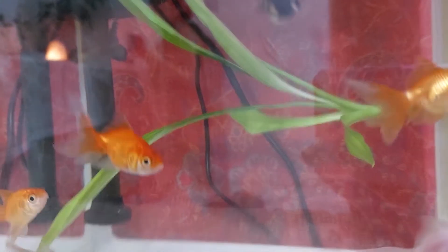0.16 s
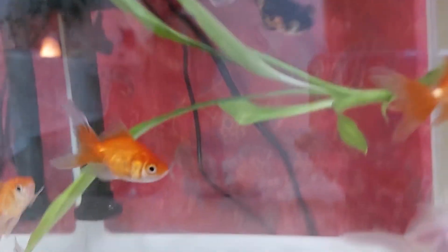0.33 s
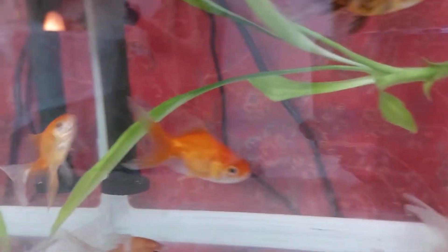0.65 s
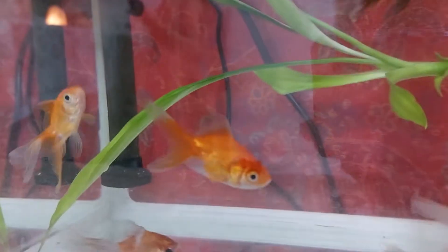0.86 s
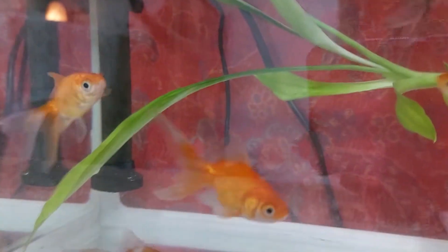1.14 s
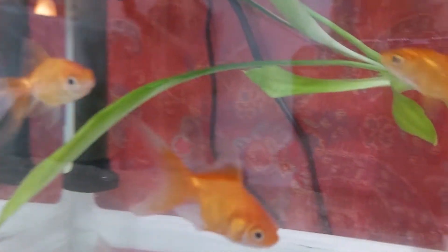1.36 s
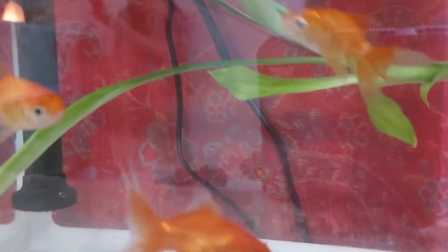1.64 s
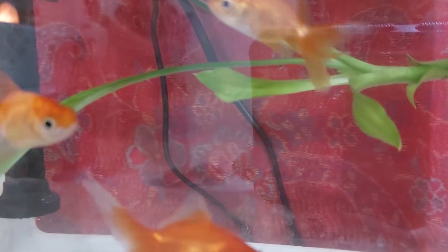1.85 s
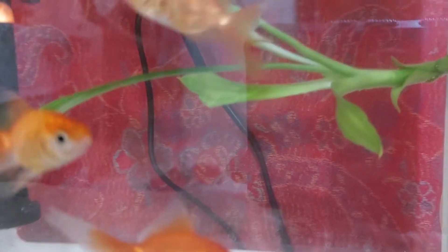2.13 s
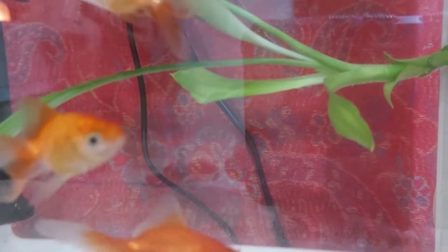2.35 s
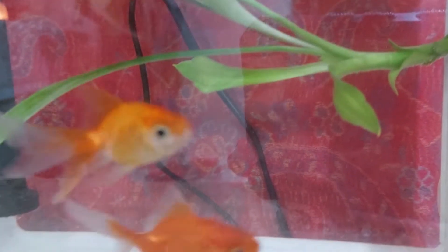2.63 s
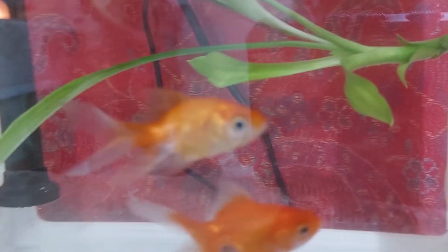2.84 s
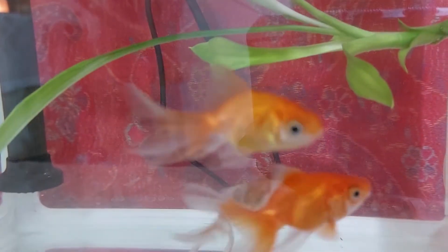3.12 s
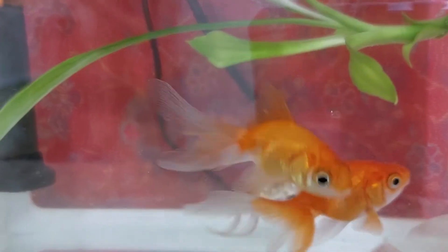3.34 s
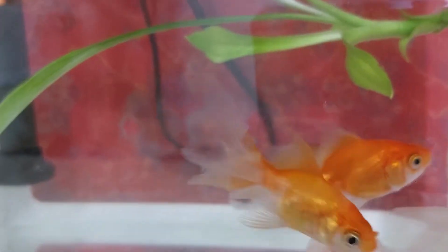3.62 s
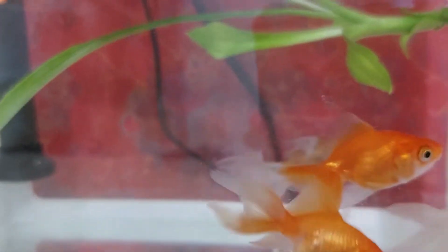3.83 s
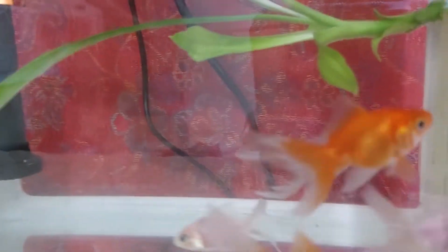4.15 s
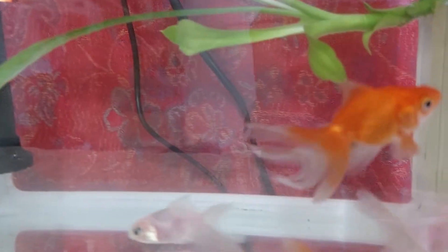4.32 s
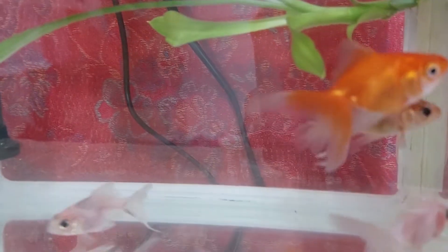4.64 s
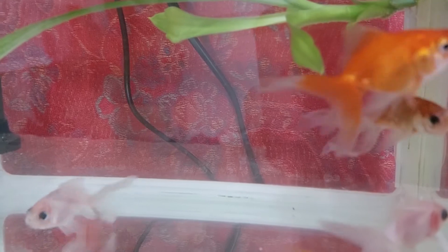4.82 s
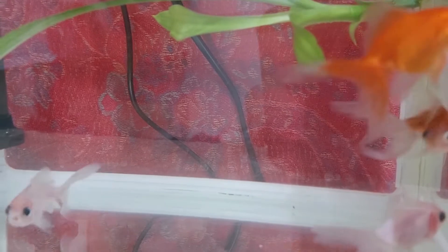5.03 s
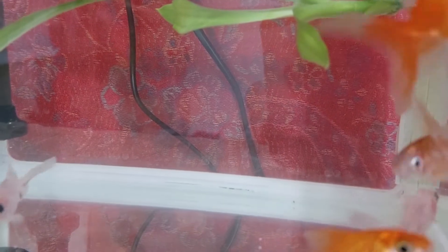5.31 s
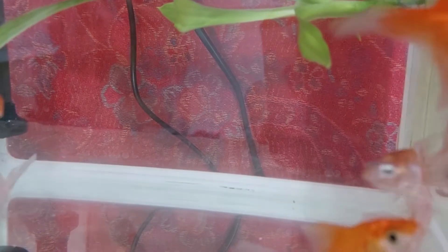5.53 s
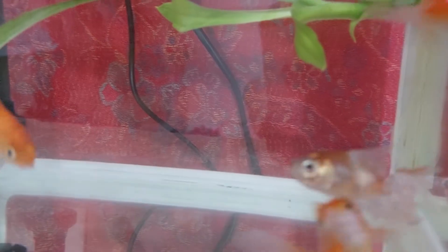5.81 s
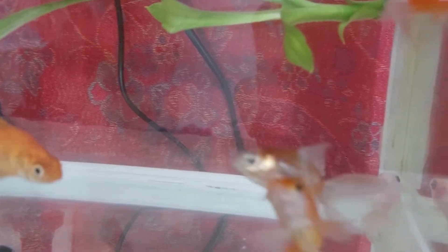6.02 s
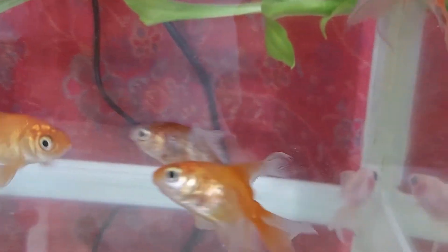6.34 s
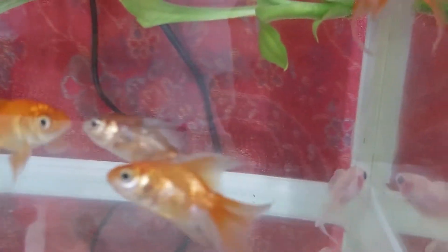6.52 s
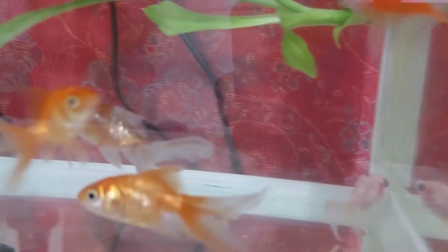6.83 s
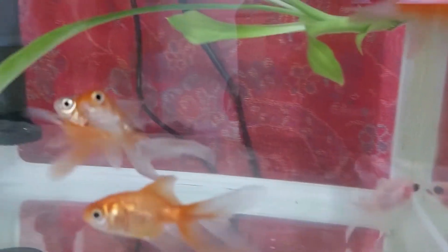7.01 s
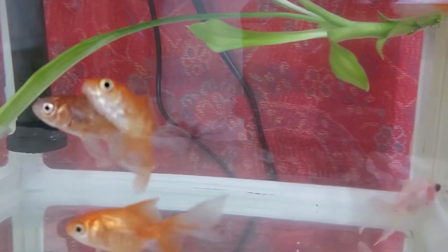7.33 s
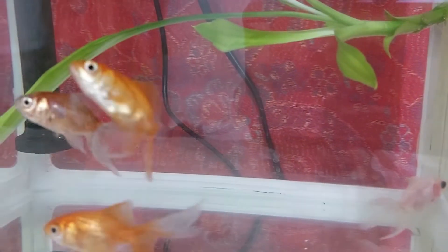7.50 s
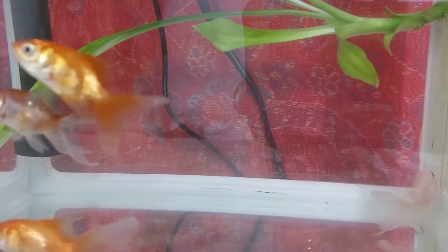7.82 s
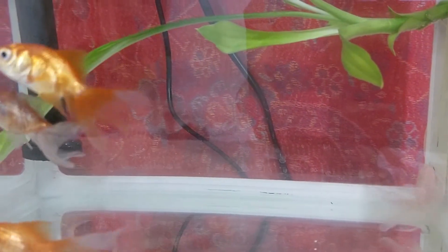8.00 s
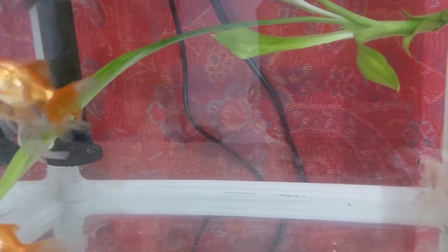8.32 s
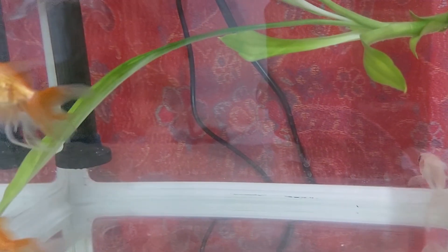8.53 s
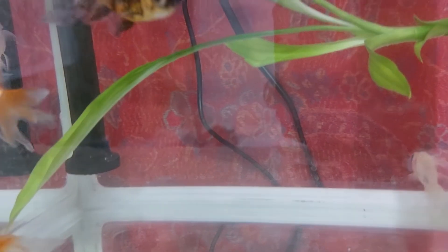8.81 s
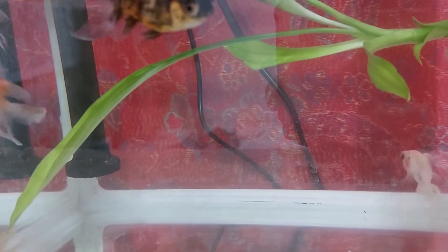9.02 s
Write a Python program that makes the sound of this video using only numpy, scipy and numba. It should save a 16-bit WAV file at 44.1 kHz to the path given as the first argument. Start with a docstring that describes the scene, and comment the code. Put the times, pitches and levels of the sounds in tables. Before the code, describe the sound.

A constant low electrical hum fills an indoor aquarium, heard near the glass in stereo. Air crackles and fizzes unevenly to the right; stirred water rumbles dully and trickles to the left. Hollow plops cluster just before one second, with short splashy washes. One more strong plop comes at three seconds, a softer one before six, among small bubble cracks, and delicate gurgling closes the scene.

```python
"""A small mains pump hums in a goldfish tank in a quiet room, heard from close to the glass.
From the start, stirred water rumbles in the tank's resonances, small bubbles trickle at the surface to the
left, and air fizzes in uneven spurts to the right. Soon single bubbles crack; large ones plop, most of them
in the first second, among brief swishes and two moments of squeaking air; then come spells of gurgling.
Sines make the hum and the ringing bubbles; filtered noise and pops make the rest. The left side is dull."""
import sys
import numpy as np
from scipy import signal
from scipy.fft import rfft, irfft
from scipy.io import wavfile
from scipy.ndimage import uniform_filter1d
from numba import njit

SR = 44100
rng = np.random.default_rng(int(sys.argv[2]) if len(sys.argv) > 2 else 0)


def to_wav(sig):
    """Store sig (one row per channel, or 1-D mono) as 16-bit WAV at the path in sys.argv[1].

    Samples outside -1..1 are clipped; the rate is SR.
    """
    pcm = np.clip(np.atleast_2d(sig), -1, 1) * 32767
    pcm = np.round(pcm).astype(np.int16)
    wavfile.write(sys.argv[1], SR, pcm.T)  # frames by channels


N = 403956
TIME = np.arange(N) / SR  # s
MAINS_HZ = 50.025
TOP_HZ = 15700  # upper edge of the microphones' range


def undb(db):
    """Decibels to amplitude gain: 20 dB is a factor of ten."""
    return 10 ** (np.asarray(db) / 20)


def unit(x):
    """Normalise the mean power: scale to rms 1."""
    return x / np.sqrt(np.mean(x ** 2))


def curves(table):
    """Linear interpolation in time: each column of a curve table, sample by sample."""
    s, *columns = np.transpose(table)
    return [np.interp(TIME, s, column) for column in columns]


def walk(rate):
    """Slow random modulation: straight lines join `rate` random points a second; rms about 1.73."""
    steps = rng.standard_normal(2048)
    return 2.12 * np.interp(TIME * rate, np.arange(len(steps)), steps)


def ring(x, modes, size=8192):
    """Modal resonance: steep-sided peaks summed in power, as one minimum-phase response; result has rms 1."""
    f = np.arange(size // 2 + 1) * SR / size
    power = sum(undb(2 * db) / (1 + (2 * (f - hz) / width) ** 2) ** 2 for hz, width, db in modes)
    # folding the cepstrum onto positive times makes the response causal
    cepstrum = irfft(np.log(power ** .5))[:size // 2]
    cepstrum[1:] *= 2
    response = irfft(np.exp(rfft(cepstrum, size)))
    return unit(signal.oaconvolve(x, response)[:N])


def pops(rate, spread_db):
    """Shot noise: impulses at random moments and of either sign, most weak and a few strong; rms 1."""
    count = int(rate * N / SR)
    moment = rng.integers(0, N, size=40000)[:count]
    sign, scatter = rng.standard_normal((2, 40000))[:, :count]
    strength = np.sign(sign) * undb(spread_db * np.minimum(scatter, 2.5))
    return unit(np.bincount(moment, strength, N))


def lowpass(x, hz, order):
    """Zero-phase filtering: a Butterworth low-pass run forwards and backwards."""
    return signal.sosfiltfilt(signal.butter(order, hz, fs=SR, output="sos"), x)


@njit
def band(x, hz, width):
    """Resonant filtering: two state-variable band-passes in a row, with a moving centre."""
    y, b, l = np.empty(len(x)), np.zeros(2), np.zeros(2)
    for i in range(len(x)):
        if i % 32 == 0:
            g, k = np.tan(np.pi * min(hz[i] / SR, .45)), width / hz[i]
        u = x[i] + 1e-18  # keeps the filter states from becoming denormal
        for j in range(2):
            v = (b[j] + g * (u - l[j])) / (1 + g * (g + k))
            b[j], l[j], u = 2 * v - b[j], l[j] + 2 * g * v, k * v
        y[i] = u
    return y


def place(x, pan_db):
    """Level-difference stereo: one sound in both channels, left minus right in dB."""
    return np.array([x * undb(pan_db / 2), x * undb(-pan_db / 2)])


def pump():
    """Magnetic hum: the magnet pulls twice per mains cycle; weaker lines waver around that steady tone."""
    # hum: time_s, rms level_db, pan_db (left minus right)
    hum_curve = [(0.2, -34.1, -1.3), (0.7, -33.5, -1.9), (1.15, -33.0, -1.4), (1.8, -31.1, 0.1),
                 (3.1, -30.7, -0.2), (4.0, -31.7, 0.1), (5.5, -31.7, 0.1), (6.7, -32.3, 0.4),
                 (7.5, -31.8, -0.2), (8.9, -31.8, -1.5)]
    # weaker tones: pitch_hz, relative_db (against the hum)
    weak_lines = [(49.6, -26.5), (153.5, -30.5), (200, -30.5), (215, -34), (222.5, -42), (287, -32),
                  (293, -31.5)]
    hum_db, pan_db = curves(hum_curve)
    hum = np.sin(2 * np.pi * 2 * MAINS_HZ * TIME + 0.033 * walk(12.0)) * undb(hum_db)
    lines = 0
    for hz, db in weak_lines:
        wavering = undb(db + 2 * walk(1.34))
        lines = lines + wavering * np.sin(2 * np.pi * hz * TIME + 0.73 * walk(3))
    return np.sqrt(2) * (place(hum, pan_db) + lines * undb(hum_db))


def rumble():
    """Cavity modes driven by turbulence; the deepest reach both microphones nearly alike."""
    # resonances of the tank and the room: centre_hz, width_hz, relative_db
    tank_modes = [(45.7, 19, -1.5), (85.5, 43.4, 4.5), (122, 13, -4), (147.8, 48, 0.5), (225, 85, -3.5),
                  (254, 29, -7.5), (287, 27.4, 1), (369, 170, -10), (428, 124, -4), (522.6, 27, -10),
                  (577, 64, -8.5), (632, 517, -23)]
    mid, side = (ring(rng.standard_normal(N), tank_modes) for _ in range(2))
    diffuse = 0.1 * side + 0.87 * (side - lowpass(side, 810, order=1))
    # the upper resonances lean to the left
    lean = mid - lowpass(mid, 420, order=1)
    sides = (.28 * lean + 1.1 * diffuse) * np.array([[1], [-1]])
    return undb(-44) * (mid + sides)


def trickle():
    """Shot excitation: dense small bubbles set off the surface's resonances, mostly to the left."""
    # resonances of the trickling surface: centre_hz, width_hz, relative_db
    surface_modes = [(1134, 150, -7), (1575, 390, -6), (1890, 85, 0), (1987, 300, -6.5), (2483, 440, 0.5)]
    # trickle before panning: time_s, level_db
    trickle_curve = [(0, -68.5), (1.2, -68), (2.2, -70.5), (9.16, -70)]
    level_db, = curves(trickle_curve)
    drops = pops(rate=3800, spread_db=4.0) * undb(0.67 * walk(22))
    return place(ring(drops, surface_modes) * undb(level_db), pan_db=26.0)


def flutter():
    """Amplitude modulation: the air flow flutters at random and pulses a little with each pump stroke."""
    stroke = np.sin(2 * np.pi * 2 * MAINS_HZ * TIME)
    return undb(1.07 * walk(55) + 0.5 * stroke)


def gushes():
    """Pressure build-up and release: the air flow stalls, then jumps to a new level and settles."""
    # stalls of the air: release_s, stall_s (time before release), stall_db, swell_db (at release)
    gush_events = [(0.041, 0.021, -14, -3), (0.238, 0.031, -6.5, 6), (0.406, 0.066, -8, -1),
                   (0.524, 0.038, -7.0, 3), (0.771, 0.055, -2, 1), (1.322, 0.026, -10, 2),
                   (1.439, 0.042, -7, 5), (1.499, 0.038, -4.5, 3), (1.607, 0.066, -4, -2),
                   (1.793, 0.048, -5, 3), (2.199, 0.025, -4, 3), (2.268, 0.028, -6, 1),
                   (2.339, 0.045, -10, -1), (2.504, 0.023, -8.5, 4), (2.754, 0.031, -7, 4.5),
                   (2.985, 0.034, -13, -0.5), (3.06, 0.043, -10, 0), (3.156, 0.024, -8, 6),
                   (3.261, 0.057, -12, -3), (3.509, 0.045, -9, -3), (3.69, 0.063, -13, 2),
                   (3.805, 0.034, -7.5, -4), (3.857, 0.033, -7.0, 3.0), (3.953, 0.043, -10, -1),
                   (4.313, 0.019, -12, -1), (4.38, 0.036, -8.5, 2.5), (4.461, 0.049, -6, -4),
                   (4.861, 0.026, -8, 2.5), (5.022, 0.033, -9.5, 3.5), (5.166, 0.041, -11, 5),
                   (5.308, 0.042, -15, 1), (5.404, 0.025, -10, 4), (5.547, 0.032, -6, 2),
                   (5.606, 0.026, -10, 1.5), (6.071, 0.047, -7, -2.0), (6.112, 0.025, -5, 3),
                   (6.402, 0.037, -10.0, 2.5), (6.45, 0.02, -9, 6), (6.535, 0.062, -7, 3),
                   (6.584, 0.042, -5, -6), (6.636, 0.024, -7.5, 1.5), (6.795, 0.041, -5, 5),
                   (6.958, 0.031, -6, -2), (7.284, 0.06, -5, 2), (7.344, 0.032, -5, -4),
                   (7.496, 0.038, -7, -3), (7.599, 0.029, -6.0, 0), (7.749, 0.034, -8, 1),
                   (7.812, 0.026, -5.5, -2), (7.918, 0.039, -7.0, -1), (8.021, 0.028, -7, -1),
                   (8.189, 0.026, -6.5, 0.5), (8.645, 0.043, -11, 2), (8.848, 0.052, -7.5, 0),
                   (9.073, 0.073, -11, 7)]
    onset_s, fade_s = 0.01, 0.021
    db = np.zeros(N)
    for s, stall, stall_db, swell_db in gush_events:
        near = slice(*np.searchsorted(TIME, [s - .5, s + .5]))
        age = TIME[near] - s
        stalled = np.clip((age + stall) / onset_s + .5, 0, 1)
        swell = swell_db * np.exp(-np.abs(age) / fade_s)
        db[near] += np.where(age < 0, stall_db * stalled, swell)
    return undb(uniform_filter1d(db, size=200))


def shade(x, hz, width, table):
    """Parametric equalisation: raise or lower one band of x along a level curve."""
    db, = curves(table)
    return x + (undb(db) - 1) * band(x, np.full(N, float(hz)), float(width))


def reflect(x):
    """Early reflections: delayed copies from the glass walls and the room join the sound; rms 1."""
    # echoes: delay_s, relative_db (against the direct sound)
    echoes = [(.0023, -17.5), (.0057, -21.5), (.0094, -11), (0.0142, -20)]
    late = sum(undb(db) * np.interp(TIME - delay, TIME, x, left=0) for delay, db in echoes)
    return unit(x + late)


def fizz():
    """Modulated shot noise: fine bubbles pop in spurts and ring the outlet's resonances over a smooth mist."""
    # resonances: centre_hz, width_hz, gain_db, swell_share (of the ring's swell; below 0 it recedes)
    fizz_modes = [(860, 830, -6.5, 0.12), (1144, 99, 2, 0.59), (1954, 520, -5, 0.21),
                  (2636, 490, -4.5, 0.31), (3590, 700, -4, -0.23), (4246, 560, 1.5, 1), (4804, 560, -4, 1),
                  (5600, 910, -10, 0.071), (6420, 820, -6, -0.097), (6990, 1130, -8.5, 0.43),
                  (8055, 560, -6, 0.22), (8640, 870, -15, 0.058), (9500, 3800, -17.5, 0.18),
                  (11550, 1230, -14, 0.013), (12150, 1100, -12.5, 0.87), (13100, 3100, -16, 0.25),
                  (15100, 3300, -18, 0.3)]
    # whole fizz before panning: time_s, level_db
    fizz_curve = [(0, -60), (0.6, -61), (1.1, -58.5), (1.5, -60.5), (4.1, -59.5), (4.7, -61), (7.1, -59.5),
                  (9.16, -59.5)]
    # swell of the ring near 4.4 kHz: time_s, gain_db
    swell_curve = [(0, 0.5), (1.1, -3.5), (2.0, 2.5), (4.1, 1), (5.3, 7), (6.8, 2.5), (7.7, -6), (9.16, -4)]
    # gain of the noise that makes the finest bubbles' mist: time_s, gain_db
    mist_curve = [(0, -23.5), (4.0, -30), (4.7, -33), (6.5, -30), (7.1, -21), (9.16, -25)]
    # band near 6.2 kHz: time_s, gain_db
    treble_curve = [(0.4, -1), (1.0, 4), (1.7, -5), (3.6, -7), (4.3, 0), (9.16, 2)]
    # band near 9 kHz: time_s, gain_db
    top_curve = [(0, 2.5), (1.3, 3.5), (2.2, 1.5), (4.0, 3.5), (5.2, -2), (6.5, -7), (7.1, -0.5),
                 (9.16, -3)]
    level_db, = curves(fizz_curve)
    swell_db, = curves(swell_curve)
    mist_db, = curves(mist_curve)
    flow = flutter() * gushes()
    crackle = pops(rate=450, spread_db=6)  # shared by all resonances
    mist = band(rng.standard_normal(N), np.full(N, 8950.0), 8700.0)
    air = undb(mist_db) * flow ** 0.82 * mist
    for hz, width, db, share in fizz_modes:
        # each size of bubble has its own pops and flutter; the swelling resonances pulse hardest
        spray = 0.75 * pops(rate=900, spread_db=4.0) + 0.47 * crackle
        # the finest bubbles follow the spurts less
        follow = 0.67 + .5 * share - 0.18 * hz / TOP_HZ
        own_flutter = undb((1.87 + 0.32 * share) * np.minimum(walk(85), 1.6))
        pulse = unit(flow ** follow * own_flutter)
        drive = spray * pulse + 0.27 * rng.standard_normal(N)
        # each resonance's pitch wavers slightly at random
        waver = 1 + 0.0043 * walk(1.134)
        air = air + undb(db + share * swell_db) * band(drive, hz * waver, float(width))
    air = shade(air, 6170, 1200, treble_curve)
    air = shade(air, 9000, 2600, top_curve)
    return place(reflect(air) * undb(level_db), pan_db=-14.0)


def ticks():
    """Impulsive excitation: single bubbles burst with a short crack of noise, each at its own pitch."""
    # bursts before panning: start_s, peak_db, pitch_hz
    tick_events = [(0.14, -49, 4400), (0.177, -59, 12000), (1.445, -51, 4170), (1.652, -49, 4330),
                   (2.679, -51, 11900), (3.184, -46, 4440), (3.752, -47, 4300), (3.769, -57, 12600),
                   (3.9589, -51, 7940), (4.112, -47, 4500), (4.564, -47, 4270), (4.613, -44.5, 4400),
                   (4.738, -45.5, 4400), (4.821, -57, 12400), (5.068, -48, 4330), (5.312, -45, 4450),
                   (5.3185, -53, 12300), (5.423, -40, 4300), (5.8531, -50, 7000), (5.897, -44, 4280),
                   (6.413, -43, 4240), (6.592, -46.5, 4300), (6.6722, -54, 11800), (7.390, -46, 4320),
                   (7.391, -47, 6500), (8.037, -57, 11900), (8.134, -51, 6500), (8.535, -54, 4300),
                   (8.591, -55, 6540), (8.925, -57, 11800), (9.056, -56, 4300)]
    fade_s, width_hz = 0.0038, 740.0
    out, age = np.zeros(N), np.arange(int(0.0048 * SR)) / SR
    for s, db, hz in tick_events:
        burst = rng.standard_normal(len(age)) * np.exp(-age / fade_s)
        crack = band(burst, np.full(len(age), float(hz)), width_hz)
        out[int(s * SR):][:len(age)] += undb(db) * crack / np.abs(crack).max()
    return place(out, pan_db=-13.5)


def bubbles(rows):
    """Damped resonance: each rings for its own number of cycles, short plop to long ping, rising a little."""
    attack_cycles = 0.67
    out = np.zeros(N + SR)
    for s, hz, cycles, db in rows:
        life = cycles / hz * SR  # in samples
        age = np.arange(int(life)) / life  # from 0 to 1
        attack = 1 - np.exp(-(cycles * age / attack_cycles) ** 2)
        tone = np.sin(2 * np.pi * cycles * age * (1 + 0.022 * age))
        bubble = tone * np.exp(-5 * age) * attack
        out[int(s * SR):][:len(age)] += undb(db) * bubble / np.abs(bubble).max()
    return out[:N]


def plops():
    """Coupled resonators: a large bubble bursts and the tank's wall answers with a dull thud."""
    # plops before panning: start_s, pitch_hz, cycles (until silent), peak_db, thud_db (peak of the thud)
    plop_events = [(0.234, 870, 6.5, -49, -62), (0.7, 420, 5.1, -39, -61), (.707, 775, 9, -45, -60),
                   (0.7783, 680, 2.6, -29.5, -32.5), (.810, 950, 6, -48, -45), (0.846, 420, 3.7, -43, -50),
                   (0.871, 480, 4.4, -48, -47), (.905, 900, 7.8, -50, -60), (.941, 420, 4.3, -40, -48),
                   (3.004, 560, 4.2, -29.5, -36), (5.668, 593, 18, -42.5, -60)]
    thud_hz, thud_cycles = 305, 3.2
    bursts = [(s, hz, cycles, db) for s, hz, cycles, db, _ in plop_events]
    thuds = [(s, thud_hz, thud_cycles, thud_db) for s, *_, thud_db in plop_events]
    return bubbles(bursts + thuds)


def swishes():
    """Enveloped noise: water washes along the glass in a spatter of drops, over a deep churning slosh."""
    # washes: start_s, length_s (time scale of the fall), level_db, slosh_db (both before the envelope)
    swish_events = [(0.316, 0.058, -47.5, -65), (0.778, 0.018, -43, -40.5), (0.787, 0.12, -48, -44),
                    (0.938, 0.022, -50, -55), (1.958, 0.071, -48, -66), (3.005, 0.007, -47, -38),
                    (5.647, 0.076, -49.5, -52), (7.127, 0.083, -44.5, -52)]
    # resonances of the wash: centre_hz, width_hz, relative_db
    swish_modes = [(506, 570, 9.5), (1160, 1100, -4), (2200, 4600, -6), (4450, 10000, -15)]
    # resonances of the slosh: centre_hz, width_hz, relative_db
    slosh_modes = [(204, 240, 5), (420, 310, -2), (950, 500, -14.5)]
    # the spatter differs between the channels, the slosh is common to both
    wash = np.array([ring(pops(rate=2200, spread_db=5.5), swish_modes) for _ in range(2)])
    slosh = ring(rng.standard_normal(N), slosh_modes) * undb(2.5 * walk(170))
    out = 0
    for s, length, db, slosh_db in swish_events:
        age = np.maximum(TIME - s, 0) / length
        envelope = (1 - np.exp(-10 * age)) * np.exp(-age ** 2)
        out = out + envelope * (undb(db) * wash + undb(slosh_db) * slosh)
    return out


def squeaks():
    """Random frequency modulation: air escaping from a bursting bubble rasps at an unsteady pitch."""
    # squeaks before roughness and panning: start_s, length_s, pitch_hz, peak_db
    squeak_events = [(0.778, 0.0024, 1800, -38), (0.7813, 0.0051, 1800, -37.5), (0.783, 0.007, 2670, -48),
                     (0.7884, 0.0032, 1880, -37.5), (0.79, 0.0035, 1770, -47), (3.006, 0.0042, 1870, -50)]
    wobble_share, wobble_per_s, rough_db = 0.065, 1230, 3.5  # share of the pitch; rate; level flicker
    out = np.zeros(N)
    for s, length, hz, db in squeak_events:
        age = np.arange(int(length * SR)) / SR
        steps = rng.standard_normal(size=(2, 32))
        wobble, rough = (np.interp(age * wobble_per_s, np.arange(len(r)), r) for r in steps)
        pitch = hz * (1 + wobble_share * wobble)
        tone = np.sin(2 * np.pi * np.cumsum(pitch) / SR)
        fade = signal.windows.tukey(len(age), .5)
        out[int(s * SR):][:len(age)] += undb(db + rough_db * rough) * tone * fade
    return out


def gurgle(count=80):
    """Bubble statistics: in each spell `count` faint bubbles a second of each size; a few ring out above."""
    # spells before the size's gain and panning: start_s, end_s, peak_db (of the loudest)
    spells = [(0.915, 1.421, -59), (4.398, 6.908, -68.5), (7.344, 8.798, -67)]
    # two sizes of bubble: pitch_hz, gain_db
    sizes = [(1640, 2.5), (1870, -7)]
    # bubbles that ring out, before panning: start_s, pitch_hz, cycles (until silent), peak_db
    pings = [(1.205, 1700, 53, -52), (6.035, 1210, 25, -53), (6.26, 1620, 70, -56), (6.325, 1850, 50, -56),
             (6.365, 1850, 120, -50.5), (7.245, 1600, 60, -54), (7.565, 1610, 100, -56),
             (7.66, 1900, 120, -56), (7.72, 1890, 160, -60), (7.76, 1900, 110, -56),
             (7.845, 2320, 120, -54), (7.885, 1560, 73, -56), (7.93, 1600, 74, -56),
             (8.21, 1900, 130, -54.5), (8.3, 1890, 110, -57), (8.43, 1890, 110, -56),
             (8.64, 1920, 120, -69)]
    spread = 0.055  # share of the pitch, up or down
    rows = list(pings)
    for start, end, db in spells:
        for hz, size_db in sizes:
            draws = rng.random((4 * count, 4))[:int(count * (end - start))]
            when, size, life, strength = draws.T
            moments = start + when * (end - start)
            pitches = hz * (1 + spread * (2 * size - 1))
            rows += zip(moments, pitches, 30 + 60 * life, db + size_db - 7 * strength)
    return bubbles(rows)


def scene():
    """Linear superposition: pump, water and air add together."""
    bubbling = place(plops() + squeaks() + gurgle(), pan_db=13.0)
    water = rumble() + trickle() + swishes() + bubbling
    return pump() + water + fizz() + ticks()


def record(dry):
    """Band limiting: the left microphone passes little treble; both hiss faintly, and the top is cut steeply."""
    dull = lowpass(dry[0], 2515, order=12)
    left = dull + undb(-19.0) * (dry[0] - dull)
    hiss = undb(-77.0) * rng.standard_normal((2, N))
    top_cut = signal.ellip(10, .2, 80, TOP_HZ, fs=SR, output="sos")
    return signal.sosfilt(top_cut, np.array([left, dry[1]]) + hiss)


dry = scene()
out = record(dry)
to_wav(out)
```